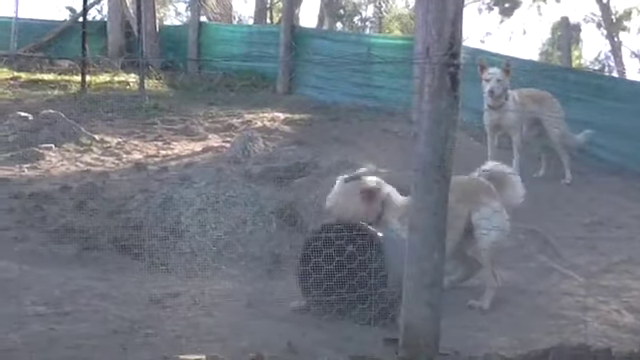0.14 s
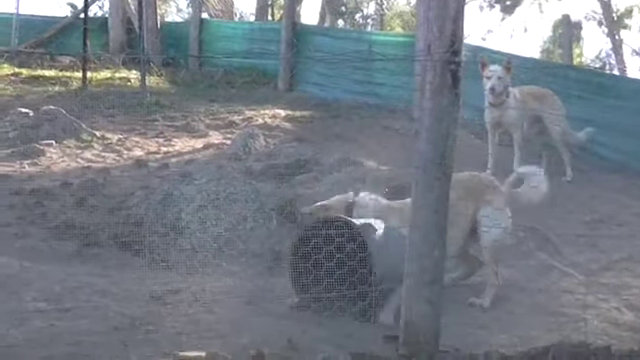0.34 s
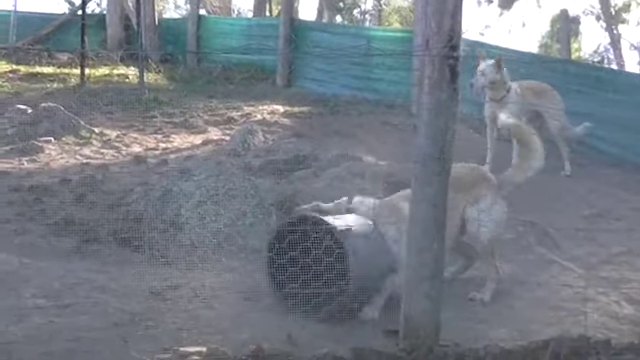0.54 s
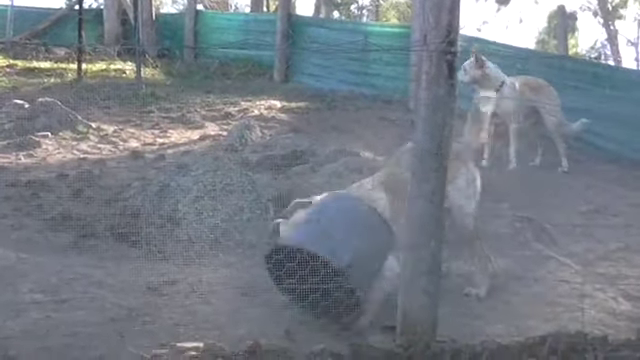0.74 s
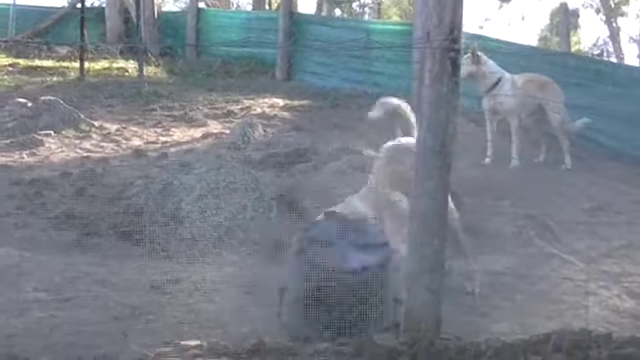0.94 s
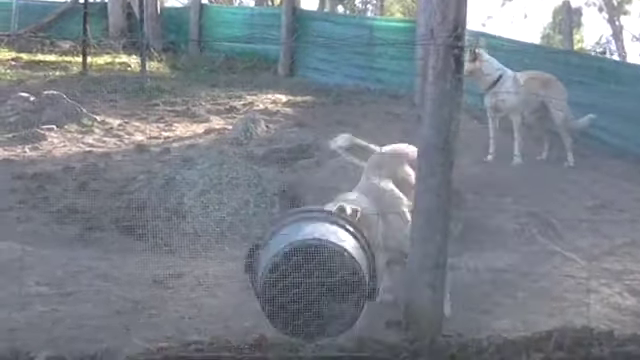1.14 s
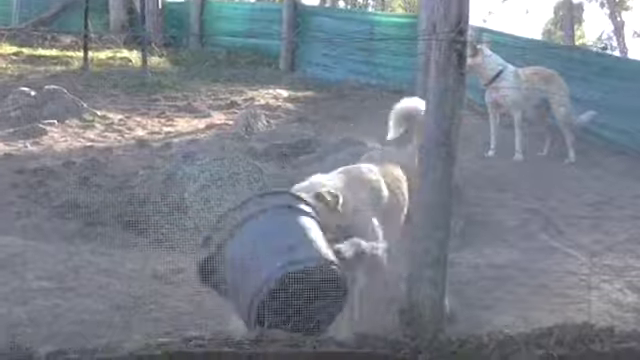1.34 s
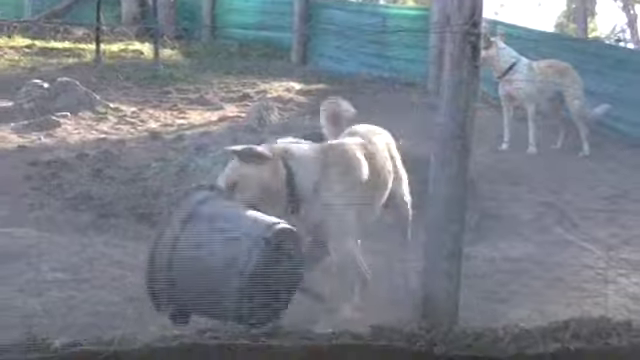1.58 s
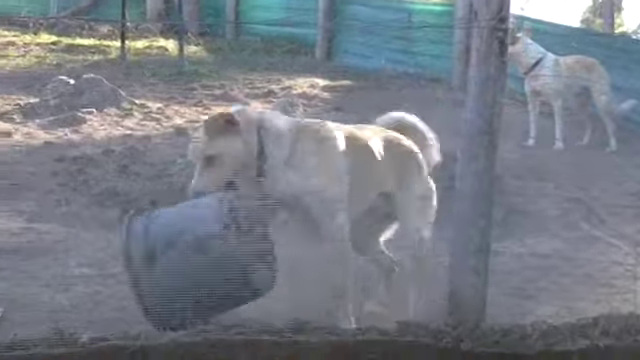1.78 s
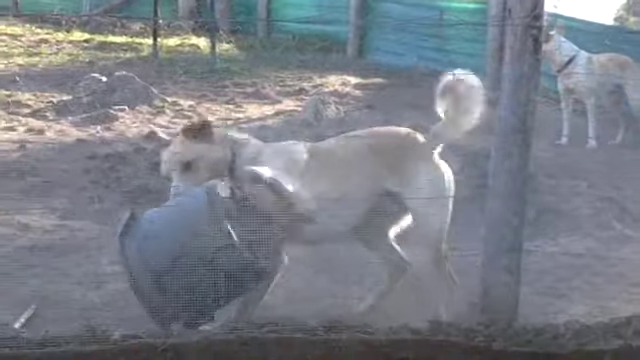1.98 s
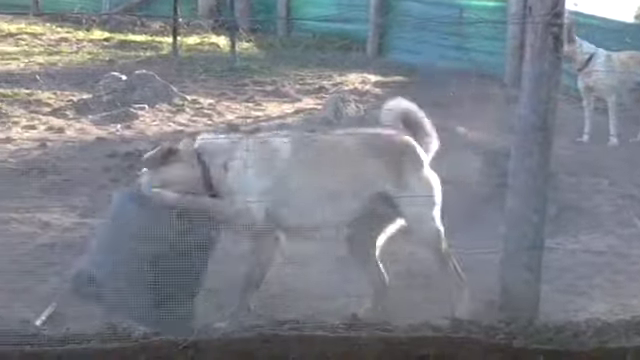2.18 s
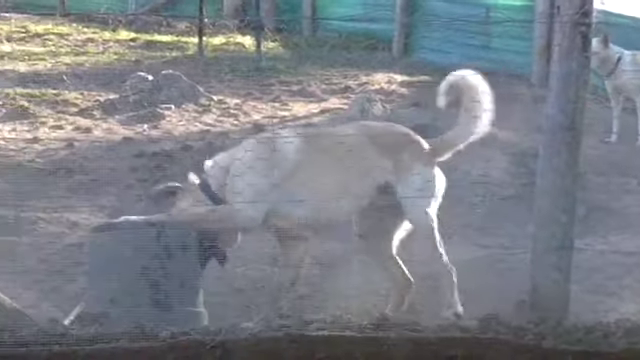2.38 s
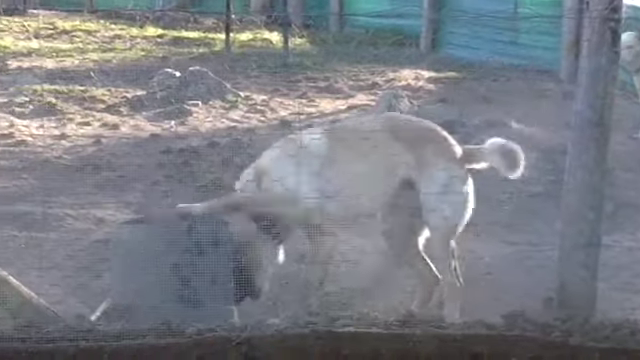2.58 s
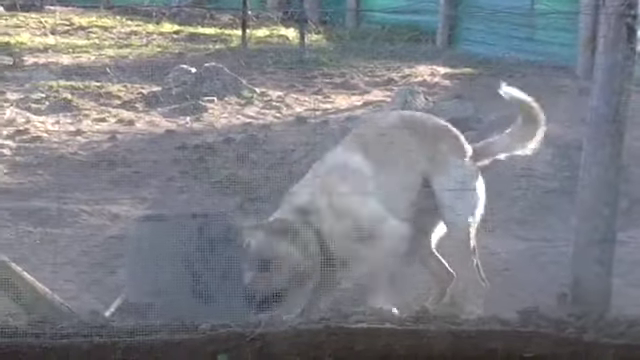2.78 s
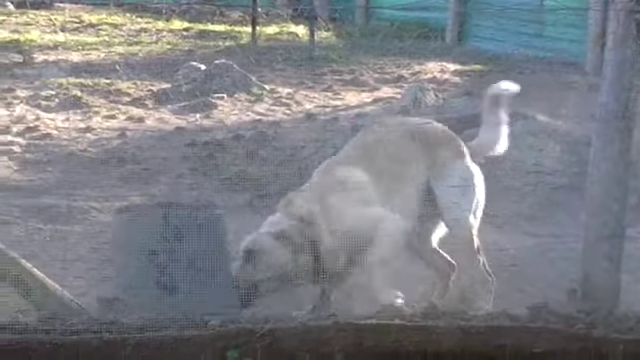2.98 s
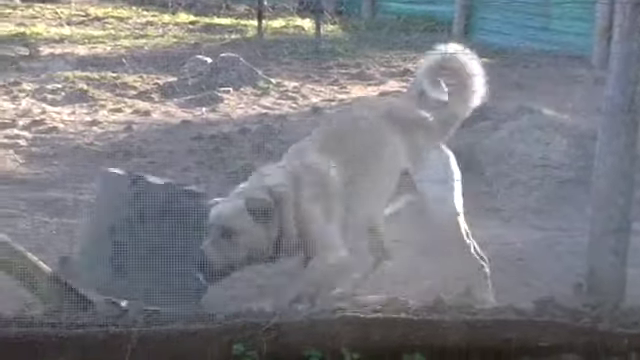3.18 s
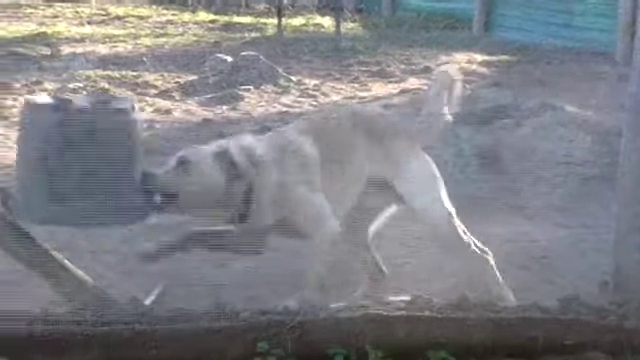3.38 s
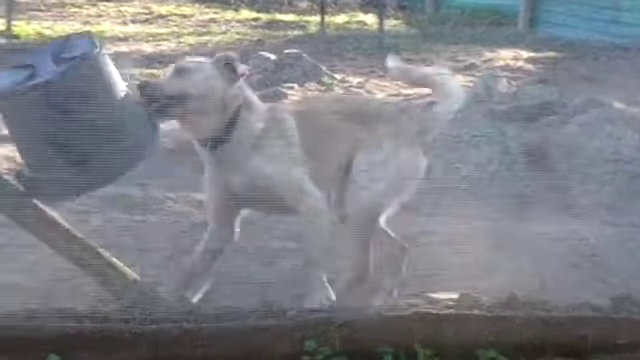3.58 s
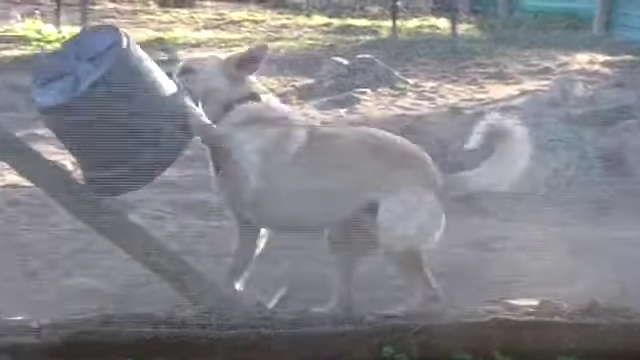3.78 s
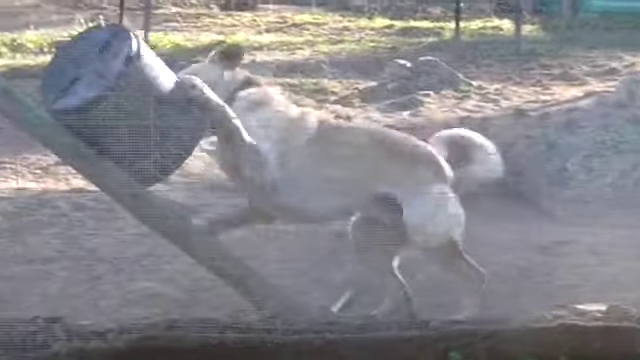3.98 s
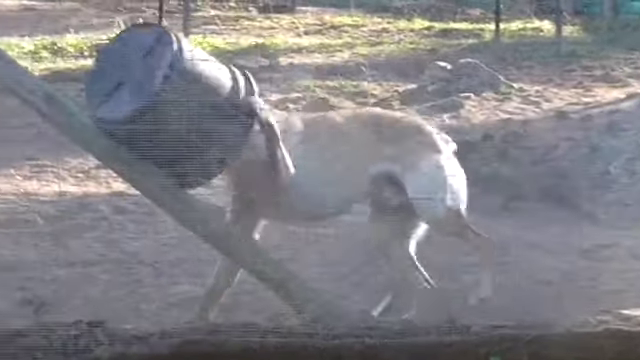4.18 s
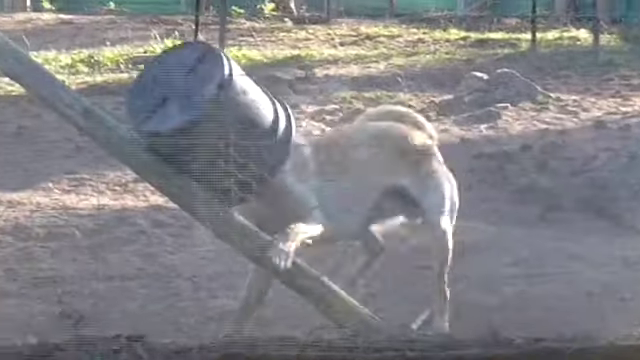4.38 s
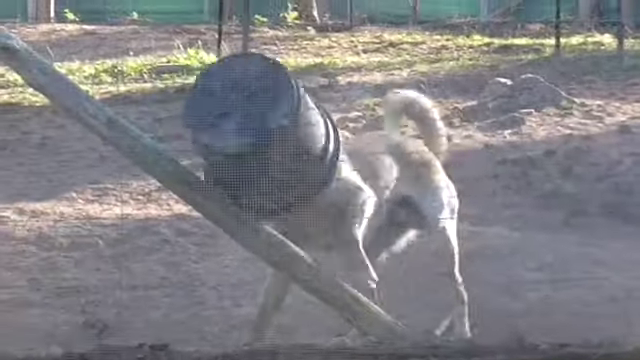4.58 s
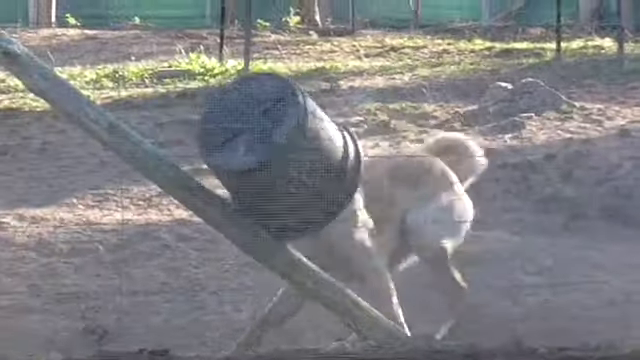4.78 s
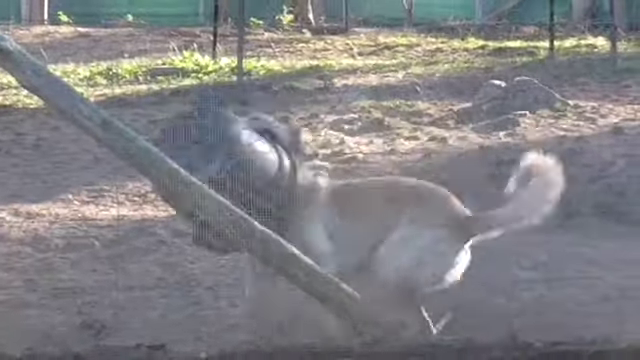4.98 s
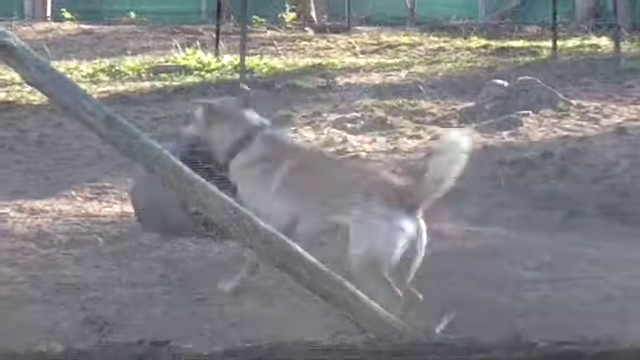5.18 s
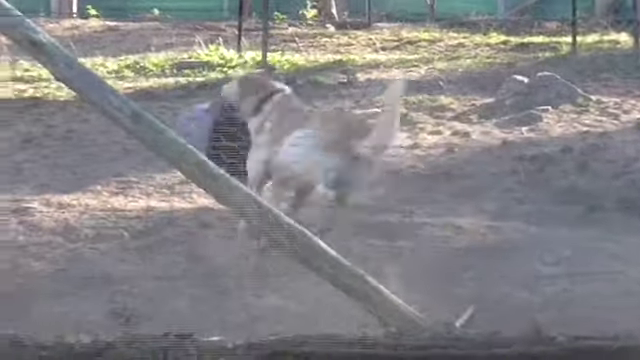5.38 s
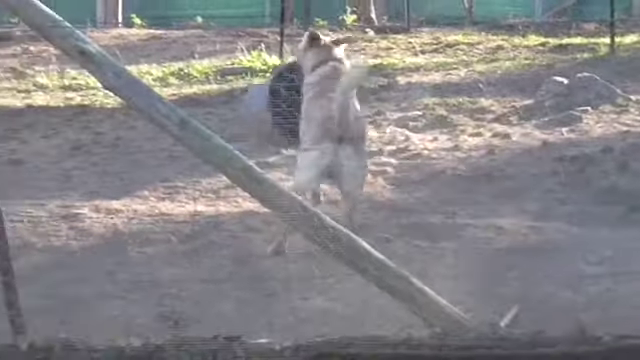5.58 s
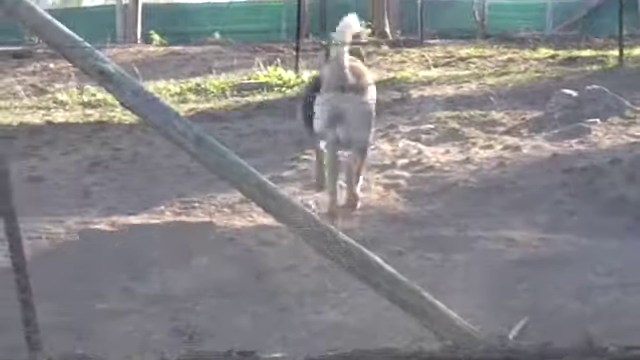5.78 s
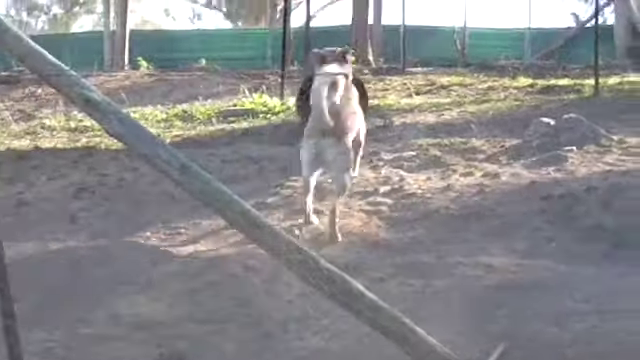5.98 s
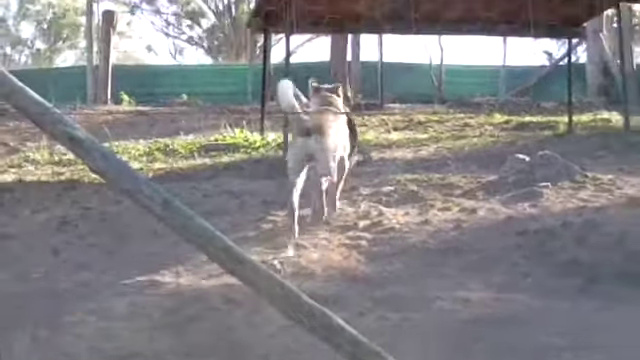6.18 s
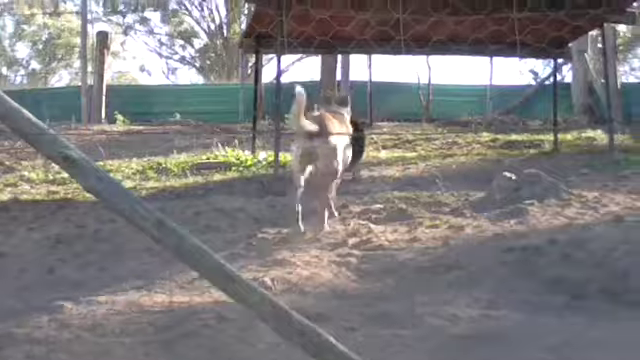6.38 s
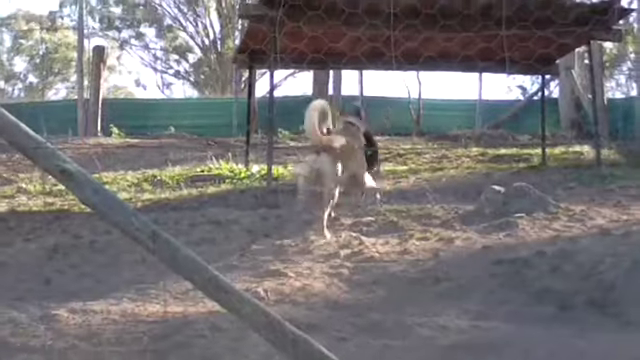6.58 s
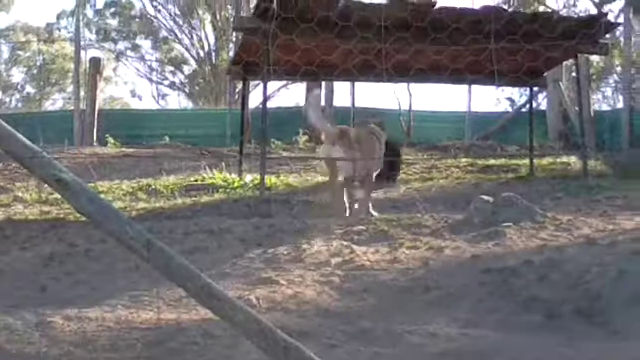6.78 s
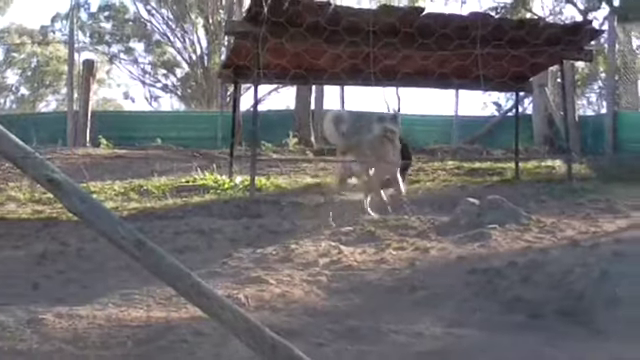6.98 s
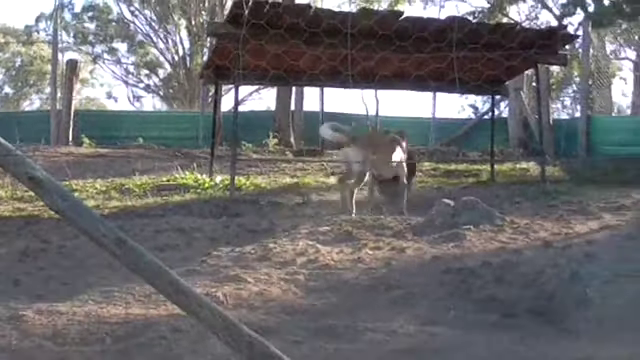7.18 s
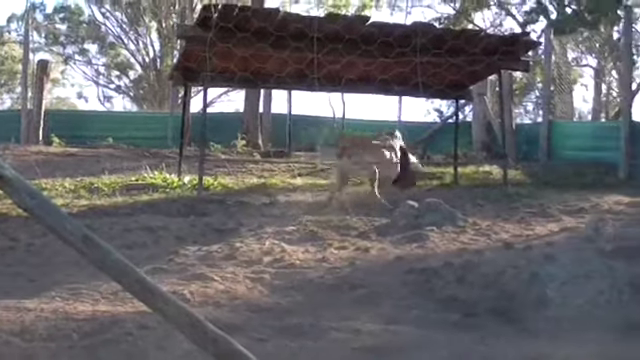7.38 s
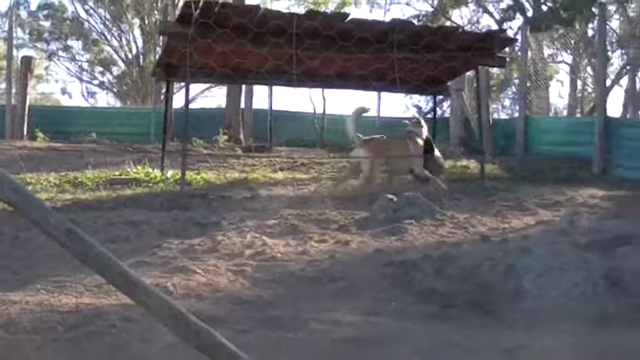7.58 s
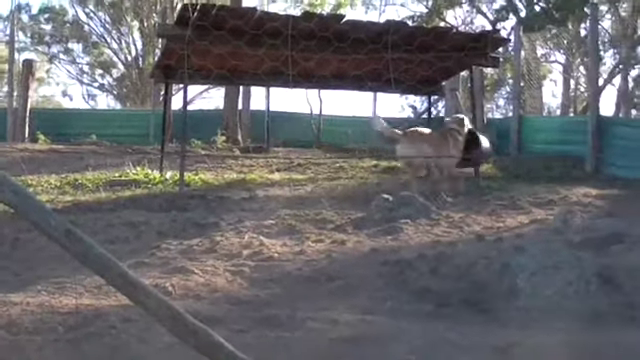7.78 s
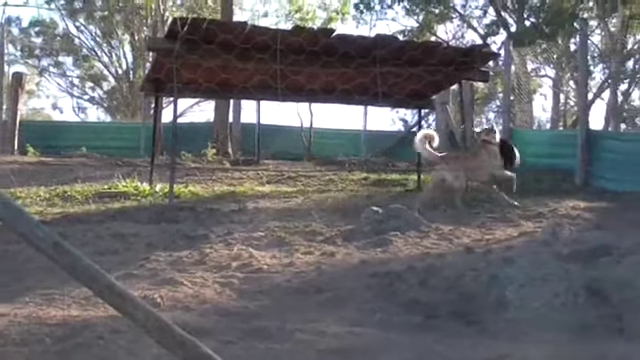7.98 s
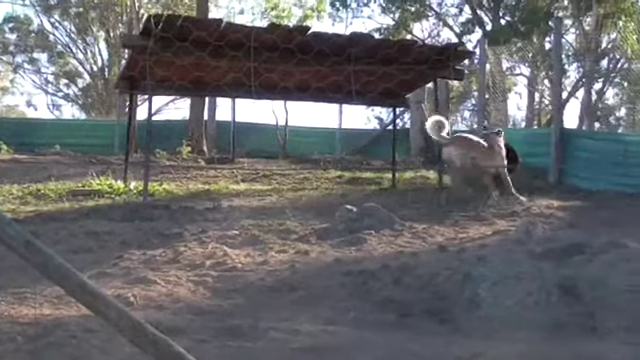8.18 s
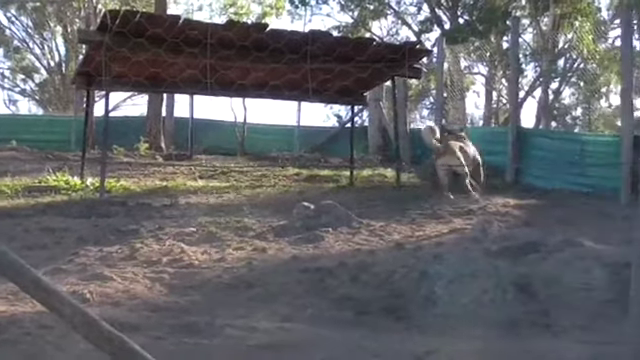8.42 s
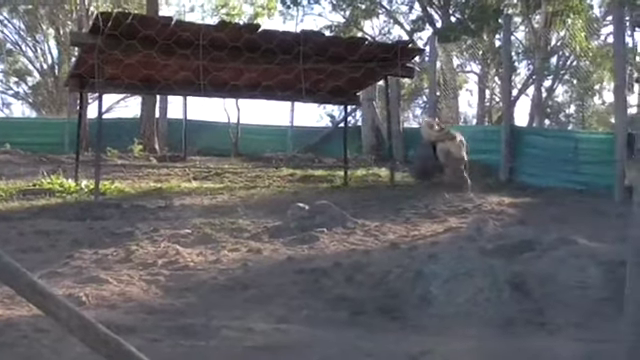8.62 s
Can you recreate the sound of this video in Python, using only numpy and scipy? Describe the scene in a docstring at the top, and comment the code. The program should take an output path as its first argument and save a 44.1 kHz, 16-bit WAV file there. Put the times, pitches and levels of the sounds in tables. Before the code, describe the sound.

In an open dirt yard, a dog plays roughly with a large plastic pot, heard in the centre by a camera microphone beyond a fence. From 0 s the pot gives short hollow knocks, rattles and scrapes, while hoarse parrots whistle brightly to the right, strongest in the first second, before a blurred distant flock. Between 1 and 1.7 s hard low booms land in quick succession with clatter and sharp ticks of claws or teeth. The heaviest thud falls near 2.5 s. Softer knocks follow around 3 s, then a loud scrape and clatter at 3.5 s, a sharp crack near 3.95 s and another deep blow at 4.1 s. Rattles and drags thin out through 5.4 s. From there to the end at about 8.6 s, only very weak knocks and soft dirt drags remain, with scattered raspy bird whistles over faint outdoor rumble.

```python
"""A dog knocks and drags a large plastic pot over a dirt yard, heard by a camera microphone beyond a fence.
From the start the pot booms, clatters and scrapes, while parrots whistle hoarsely in tall trees to the right.
Hard blows come between one and two seconds, the hardest near 2.5 s; grit and sharp ticks run between them.
After about 5.5 s only weak knocks and soft drags are left, with the birds over a faint outdoor rumble.
Sine bursts make booms and whistles; filtered noise makes wall, ticks, dirt, flock blur and yard."""
import sys
import numpy as np
from scipy import signal
from scipy.fft import rfft, irfft
from scipy.io import wavfile

SR = 44100
rng = np.random.default_rng(int(sys.argv[2]) if len(sys.argv) > 2 else 0)


def dump(signal):
    """Clip the signal to [-1, 1] and save it as 16-bit WAV at the path in sys.argv[1]."""
    limited = np.clip(np.atleast_2d(signal).T, -1, 1)
    pcm = np.round(limited * 32767).astype(np.int16)
    wavfile.write(sys.argv[1], SR, pcm)


N = 381465
T = np.arange(N) / SR


def undb(db):
    """Decibels to gain."""
    return np.exp(np.asarray(db) * np.log(10) / 20)


def unit(x):
    """Scale to rms 1."""
    return x / np.sqrt(np.mean(x ** 2))


def noise(n=N):
    """White noise of rms near 1."""
    return rng.standard_normal(n)


def walk(rate, n=N):
    """Random levels drawn rate times a second and joined by straight lines; spread near 1."""
    steps = int(n * rate / SR) + 2
    return 1.2 * np.interp(np.arange(n) * rate / SR, np.arange(steps), rng.standard_normal(steps))


def band(x, hz, width):
    """A resonance of gain 1 at its centre."""
    return signal.lfilter(*signal.iirpeak(hz, hz / width, SR), x)


def body(x, modes, wander_db=0.):
    """Sum of resonances of alternating sign, whose strengths wander separately."""
    total = 0
    for k, (hz, width, db) in enumerate(modes):
        strength = undb(db + wander_db * walk(9))
        total = total + (-1) ** k * strength * band(x, hz, width)
    return total


def cut(x, hz, kind):
    """Second-order low- or high-pass."""
    return signal.lfilter(*signal.butter(2, hz, kind, fs=SR), x)


def add(track, s, x):
    """Mix x into track from time s in seconds."""
    i = int(s * SR)
    track[i:i + len(x)] += x[:N - i]


def decay(t, t60):
    """Exponential fade by 60 dB in t60 seconds."""
    return undb(-60 * t / t60)


def grit(spread_db):
    """Dense grains of uneven size, rms 1."""
    size = np.minimum(rng.exponential(size=N), 6)
    return unit(noise() * undb(spread_db * size))


def tail(t60, wet_db, gap_s):
    """Left and right responses: scattered echoes dying away after a gap."""
    t = T[:int(t60 * SR)]
    h = rng.standard_normal((2, len(t))) * decay(t, t60) * (t > gap_s)
    return h / np.sqrt(np.sum(h ** 2, axis=1, keepdims=True)) * undb(wet_db)


def swells(s, length, db, rest_db, rise_db, fall_db):
    """Gain of overlapping round-topped swells over a resting level; far slopes are in dB per length."""
    t = T[::100]
    u = (t[:, None] - s) / length
    down = np.where(u < 0, rise_db, fall_db) * (np.hypot(u, .3) - .3)
    power = undb(2 * rest_db) + np.sum(undb(2 * (db - down)), axis=1)
    return np.interp(T, t, np.sqrt(power))


# Open air around the yard. Each point: frequency in Hz, relative spectral level in dB.
YARD_COLOUR = [(18, -32), (30, 1.5), (237, 13.5), (359, 8), (467, 14), (591, 5), (709, 11.5), (1550, 8),
               (4090, 1.5), (11000, -56), (15500, -63)]
# Steady background hums. Each row: centre in Hz, width of each of two passes in Hz, rms level in dB.
YARD_HUMS = [(243.7, 29, -69), (477, 57, -65.5)]


def yard():
    """Far rumble and air, shaped noise mostly unlike left and right, with two narrow hums in the middle."""
    hz, db = np.transpose(YARD_COLOUR)
    f = np.fft.rfftfreq(N, 1 / SR) + 1  # 1 Hz up, to avoid log of zero
    colour = undb(np.interp(np.log(f), np.log(hz), db))
    mid, left, right = (irfft(rfft(noise()) * colour, N) for _ in range(3))
    air = unit(0.1 * mid + np.array([left, right]))
    hums = sum(undb(level) * unit(band(band(noise(), h, width), h, width))
               for h, width, level in YARD_HUMS)
    return undb(-57 + 0.57 * walk(3.48)) * air + hums


def whistle(length, hz0, hz1, db, over_db):
    """A hoarse whistle scoops up and glides: a wavering, fluttering tone with three raspy overtones."""
    u = np.linspace(0, 1, int(length * SR))
    n = len(u)
    glide = hz0 + (hz1 - hz0) * u ** .7
    scoop = .07 * np.exp(-u * length / .01)
    hz = glide * (1 - scoop + .011 * walk(60, n) + .012 * walk(700, n))
    phase = 2 * np.pi * np.cumsum(hz) / SR
    rasp = phase + .45 * walk(600, n)
    over = unit(np.sin(2 * rasp) + 0.22 * np.sin(3 * rasp) + 0.064 * np.sin(4 * rasp))
    # the throat opens and shuts, but never quite
    tone_gate, over_gate = (unit(1.6 + np.tanh(1.5 * walk(70, n))) for _ in range(2))
    tone = tone_gate * np.sin(phase) * (1 + 0.25 * walk(500, n))
    tone = tone + undb(over_db) * over_gate * over
    return undb(db) * np.sin(np.pi * u) ** 0.34 * tone


# Bands of the distant flock's blur. Each row: centre in Hz, width in Hz, mean relative level in dB.
FLOCK_BANDS = [(3780, 1140, 8), (4500, 450, 8), (5250, 1640, 4), (6430, 850, -4), (10000, 1200, -13)]
# Outbursts of the far flock. Each row: peak time in seconds, length in seconds,
# level in dB before the flock is set to the right.
FLOCK_OUTBURSTS = [(0.127, 0.4, -42), (0.543, 0.14, -43.5), (0.875, 0.34, -45), (1.796, 1, -51.5),
                   (2.145, 1, -51.5), (2.9, 0.26, -46), (3.13, 0.19, -53.5), (3.846, 0.21, -46.5),
                   (4.396, 0.17, -53), (4.997, 0.42, -53), (5.253, 0.21, -48), (5.894, 0.78, -52),
                   (6.508, 0.11, -45.5), (6.824, 0.21, -46), (7.264, 0.52, -51.5), (7.868, 0.14, -46.5),
                   (8.077, 0.23, -46), (8.461, 0.076, -44)]


def flock():
    """Many short far calls at random over flickering noise bands, the blur of still more birds."""
    chirps = np.zeros((2, N))
    for k, (when, pitch, long, bend) in enumerate(rng.random((120, 4))):
        hz = 3300 * 2 ** (.8 * pitch ** 1.4)
        call = whistle(0.0182 + 0.0652 * long, hz * (.85 + .2 * bend), hz, db=0, over_db=-26.5)
        add(chirps[k % 2], when * N / SR, call)
    echoes = signal.fftconvolve(chirps, tail(0.4, 1.4, 0.0015), axes=1)[:, :N]
    chirps = chirps + echoes + 0.94 * chirps[::-1]  # much of each side is heard on the other
    mid, left, right = (body(band(noise(), 2600, 8000), FLOCK_BANDS, wander_db=6.0) * undb(3.2 * walk(40))
                        for _ in range(3))
    blur = unit(mid + 2.13 * np.array([left, right]))
    swell = swells(*np.transpose(FLOCK_OUTBURSTS), rest_db=-93, rise_db=21.5, fall_db=16.5)
    return swell * (blur + undb(-8) * unit(chirps))


# Tones of the nearer parrots to the right, whistles and some single strong overtones. Each row:
# start in seconds, length in seconds, start of glide in Hz, end of glide in Hz,
# level in dB before trees and placing.
NEAR_TONES = [ (0.062, 0.18, 2980, 3553, -35), (0.054, 0.13, 3750, 4470, -37.5),
              (0.464, 0.12, 4650, 5600, -44), (0.558, 0.086, 4070, 4060, -37),
              (0.604, 0.11, 3360, 3130, -44.5), (0.801, 0.08, 3940, 4370, -37.5),
              (0.806, 0.2, 3056, 3540, -38), (1.111, 0.2, 4090, 4200, -49),
              (1.212, 0.19, 3220, 3310, -53.5), (1.997, 0.085, 4730, 5920, -54),
              (2.038, 0.071, 3950, 3950, -42), (2.081, 0.18, 3300, 3225, -49.5),
              (2.429, 0.096, 4060, 4060, -48.5), (2.694, 0.034, 2830, 4430, -48),
              (2.72, 0.038, 4230, 4150, -54), (2.757, 0.024, 4480, 4600, -42.5),
              (2.78, 0.037, 3840, 3930, -39.5), (2.807, 0.077, 2720, 2710, -50),
              (2.873, 0.086, 4230, 4120, -48), (2.903, 0.173, 3100, 3130, -50.5),
              (3.078, 0.12, 2920, 2990, -51.5), (3.146, 0.055, 3676, 3760, -47.5),
              (4.674, 0.25, 2860, 4240, -54), (4.845, 0.71, 3605, 3380, -53),
              (5.062, 0.17, 1770, 1764, -55), (4.899, 0.3, 4440, 4350, -57),
              (5.189, 0.13, 4440, 4390, -43.5), (5.26, 0.2, 3750, 3250, -52), (5.537, 0.25, 900, 1623, -58),
              (5.546, 0.088, 3800, 3320, -49), (5.719, 0.026, 3160, 4550, -47),
              (5.743, 0.034, 3600, 3500, -44), (5.9, 0.23, 3524, 3560, -48),
              (5.877, 0.28, 1670, 1768, -58.5), (6.034, 0.18, 2854, 3277, -48.5),
              (5.932, 0.12, 5040, 5360, -56), (6.038, 0.16, 6070, 6080, -71),
              (6.385, 0.045, 4400, 5420, -53), (6.733, 0.17, 3610, 3490, -49),
              (6.745, 0.085, 878, 961, -50.5), (6.848, 0.19, 3420, 2750, -52),
              (6.892, 0.11, 3940, 4220, -50), (7.066, 0.1, 4230, 4390, -49), (7.11, 0.26, 6000, 5870, -56),
              (7.096, 0.131, 2960, 2900, -54), (7.183, 0.16, 3310, 3120, -50),
              (7.26, 0.14, 2570, 2430, -49.5), (7.395, 0.1, 2503, 1945, -48),
              (7.572, 0.041, 3660, 3550, -46), (7.742, 0.02, 5020, 3900, -45),
              (7.756, 0.022, 4150, 5200, -47), (7.895, 0.062, 3440, 3700, -49),
              (8.09, 0.035, 1900, 4350, -53), (8.449, 0.046, 1707, 1660, -49.5),
              (8.435, 0.055, 3750, 4050, -44.5), (8.454, 0.058, 3400, 3180, -53.5)]
# Change of overtone level: dB lost per octave below the knee (negative: gained), dB lost per octave above.
OVERTONE_LOSS = (-2.5, 128)


def near_tones():
    """The nearer birds' whistles and separate overtone lines; added overtones vanish above a knee pitch."""
    out = np.zeros(N)
    knee_hz, knee_db = 3302, -6.5
    for s, length, hz0, hz1, db in NEAR_TONES:
        octaves = np.log2((hz0 + hz1) / 2 / knee_hz)
        over_db = knee_db - OVERTONE_LOSS[int(octaves > 0)] * abs(octaves)
        add(out, s, whistle(length, hz0, hz1, db, over_db))
    return out


def birds():
    """Near calls scatter among echoing trunks; all the birds are louder on the right."""
    calls = near_tones()
    echoes = signal.fftconvolve(calls[None], tail(0.44, -4.5, 0.013))[:, :N]
    return (0.92 * calls + echoes + flock()) * undb([[-2.2], [2.2]])


# Shoves of pot and paws over the ground. Each row: peak time in seconds, length in seconds,
# then drive in dB of the hollow's drone, the wall's scrape and the loose dirt.
GROUND_SHOVES = [(0.01, 0.13, -58, -35, -67), (0.095, 0.094, -31, -44, -39.5), (0.214, 0.78, -45, -45, -60),
                 (0.866, 0.073, -34, -40.5, -47), (1.101, 0.06, -67, -37, -49),
                 (1.66, 0.032, -50, -57, -36.5), (1.73, 0.24, -38.5, -43.5, -54.5),
                 (2.33, 0.36, -39.5, -50.5, -54.5), (2.78, 0.17, -42, -50, -59),
                 (3.053, 0.16, -40.5, -43.5, -62), (3.287, 0.17, -33.5, -42.5, -60.5),
                 (3.436, 0.34, -33.5, -38, -65), (3.541, 0.17, -33, -30, -42),
                 (4.172, 0.14, -33, -49.5, -55), (4.472, 0.19, -62, -42.5, -59),
                 (4.866, 0.39, -36.5, -53, -55), (5.01, 0.13, -61, -42, -66),
                 (5.373, 0.07, -33, -47.5, -50), (5.71, 0.32, -53, -53.5, -57),
                 (6.481, 0.23, -81, -58.5, -62.5), (8.055, 0.53, -85, -59, -66)]
# Drive between shoves: hollow, wall and dirt, each in dB.
SHOVE_REST = (-93, -67.5, -71.5)


def shoves(layer):
    """How hard the shoves drive layer 0 (hollow), 1 (wall) or 2 (dirt)."""
    s, length, *db = np.transpose(GROUND_SHOVES)
    return swells(s, length, db[layer], SHOVE_REST[layer], rise_db=20.5, fall_db=23)


def dirt():
    """Loose dirt hisses under the shoves: fine grains, partly unlike left and right."""
    mid, side = (unit(cut(cut(grit(4.1) * undb(2 * walk(40)), 2460, "high"), 8700, "low"))
                 for _ in range(2))
    return shoves(layer=2) * (mid + 1.2 * side * np.array([[.5], [-1]]))


# Air modes of the hollow pot. Each row: centre in Hz, width in Hz, relative level in dB.
HOLLOW_MODES = [(217, 26.7, 8), (318, 13, -33), (139, 140, -19)]
# Modes of the plastic wall. Each row: centre in Hz, width in Hz, mean relative level in dB.
WALL_MODES = [(506, 54, 1.5), (645, 49, 2), (779, 55.5, -0.5), (1009, 92, -0.5), (1179, 98, -3.5),
              (1447, 220, 0), (1634, 170, -5.5), (1743, 72, -0.5), (1888, 384, -10), (2412, 270, -10)]


def drag():
    """Stick and slip over the ground: uneven noise drives the hollow and the wall, and rasps at the rim."""
    air = unit(body(noise() * undb(3.8 * walk(25)), HOLLOW_MODES))
    slips = band(grit(4.5) * undb(3.6 * walk(80)), 1130, 1720)
    rim = unit(band(slips, 1300, 1300))
    wall = unit(body(slips, WALL_MODES, wander_db=3.5)) + .45 * rim
    return air * shoves(layer=0) + unit(wall) * shoves(layer=1)


# Claws, teeth and stones ticking on plastic. Each row: time in seconds (onset 2 ms before),
# noise level in dB before filtering.
PLASTIC_TICKS = [(1.194, -37), (1.3414, -26), (1.48, -32.5), (1.6153, -30.5), (2.2394, -33),
                 (2.2508, -26.5), (3.227, -41), (2.4733, -32.5), (3.5583, -24), (3.9507, -15),
                 (3.9824, -34), (4.151, -31), (4.512, -37.5), (4.579, -35), (4.602, -36.5), (4.797, -35),
                 (5.345, -28)]


def ticks():
    """Hard points crack on the plastic: sharp noise bursts with a brief scratchy tail."""
    out, t = np.zeros(N), T[:SR // 5]
    fade = (1 - np.exp(-t / 0.0012)) * (decay(t, 0.011) + 0.055 * decay(t, 0.22))
    fade = fade / fade.max()
    for s, db in PLASTIC_TICKS:
        add(out, s - .002, undb(db) * noise(len(t)) * fade)
    return cut(cut(out, 2530, "high"), 9000, "low")


# Shakes of the pot wall. Each row: time in seconds (onset 2 ms before), drive in dB,
# frequency favoured by the place of contact in Hz.
WALL_SHAKES = [(0.031, -21, 590), (0.17, -31.5, 760), (0.675, -26, 776), (1.089, -17.5, 1320),
               (1.169, -19.5, 530), (1.194, -25, 547), (1.342, -25, 1290), (1.484, -27, 1340),
               (1.564, -40, 2240), (1.613, -32.5, 1560), (1.642, -29.5, 1660), (1.945, -37.5, 590),
               (2.088, -38, 1270), (2.138, -34, 1370), (2.248, -26, 1100), (2.285, -34.5, 1400),
               (2.365, -37.5, 600), (2.472, -17.5, 610), (3.225, -24.5, 496), (3.489, -25, 1200),
               (3.555, -21, 1780), (3.57, -17, 644), (3.662, -25.5, 890), (3.95, -15.5, 1300),
               (4.112, -19.5, 1000), (4.153, -26.5, 1340), (4.626, -31, 1080), (4.644, -28, 970),
               (4.744, -34, 1180), (4.799, -26.5, 1180), (4.814, -23.5, 1190), (4.865, -25, 1080),
               (5.076, -37, 1100), (5.326, -33.5, 520)]


def clatter():
    """Each shake is an uneven, fast-fading rattle of the wall; the contact favours modes near one pitch."""
    shake, t = np.zeros(N), T[:SR // 4]
    fade = 4.8 * decay(t, 0.011) + decay(t, 0.054) + 0.32 * decay(t, 0.3)
    fade = (1 - np.exp(-t / 0.0024)) * fade
    for s, db, hz in WALL_SHAKES:
        rattle = unit(noise(len(t)) * undb(2.5 * walk(119, len(t))) * fade)
        add(shake, s - .002, undb(db) * (0.68 * band(rattle, hz, 0.41 * hz) + 0.33 * rattle))
    wall = body(shake, WALL_MODES, wander_db=3.0) + 0.27 * band(shake, 890, 2150)
    return cut(wall, 3150, "low")


# Blows on the pot. Each row: time in seconds (onset 8 ms before), peak of this boom alone in dB,
# pitch in Hz, time to fall 60 dB in seconds (held to 0.03-0.5).
POT_BLOWS = [(0.038, -27, 213, 0.072), (0.112, -22.5, 216, 0.14), (0.174, -18.5, 233, 0.1),
             (0.368, -30.5, 223, 0.1), (0.587, -30.5, 225, 0.095), (0.763, -28, 225, 0.17),
             (0.883, -30, 279, 0.098), (1.091, -11.5, 213, 0.22), (1.176, -18.5, 223.5, 0.18),
             (1.359, -10, 210, 0.14), (1.489, -25, 206, 0.13), (1.611, -9.5, 215.7, 0.19),
             (1.735, -39, 286.5, 0.38), (2.151, -36, 216.7, 0.28), (2.245, -22, 272.4, 0.17),
             (2.305, -21.5, 266, 0.13), (2.368, -22.5, 277, 0.07), (2.482, -3, 198, 0.1),
             (2.781, -35, 233, 0.21), (2.954, -23, 160.5, 0.14), (3.006, -19, 194.4, 0.16),
             (3.045, -21.5, 179, 0.15), (3.146, -26, 218, 0.12), (3.18, -23.5, 192, 0.2),
             (3.279, -21.5, 217, 0.26), (3.657, -29.5, 227, 0.29), (3.954, -16.5, 222.5, 0.28),
             (4.122, -8.5, 209, 0.057), (4.534, -33, 184, 0.055), (4.656, -16, 210.6, 0.11),
             (4.809, -19.5, 226, 0.13), (4.865, -25, 205, 0.13), (5.077, -32, 229.3, 0.15),
             (5.33, -23.5, 200, 0.065), (5.376, -26, 206, 0.11), (5.857, -34, 213.5, 0.15),
             (6.329, -44, 214, 0.21), (6.755, -44, 215, 0.2), (7.749, -45, 220, 0.12),
             (8.21, -47.5, 220, 0.14)]


def blows():
    """Each blow pushes the air in the pot, and the hollow rings out as a decaying tone."""
    boom, t = np.zeros(N), T[:SR // 2]
    rise = (1 - np.exp(-t / 0.0026)) ** 2
    for s, db, hz, t60 in POT_BLOWS:
        air = np.sin(2 * np.pi * hz * t) * decay(t, np.clip(t60, .03, .5))
        # a duller, lower flex of the base beats against it
        air += undb(-13.0) * np.sin(2 * np.pi * 0.752 * hz * t) * decay(t, 0.15)
        air *= rise * undb(2.2 * walk(70, len(t)))  # the level wobbles as the pot rocks
        add(boom, s - .008, undb(db) * air / np.abs(air).max())
    return boom


def fence(pot):
    """The fence scatters the pot's sound, without its lows, in a short echo to both sides."""
    bright = cut(cut(pot, 340, "high"), 340, "high")
    return signal.fftconvolve(bright[None], tail(0.1, -8.0, 0.0032))[:, :N]


def scene():
    """The pot in the middle, the birds to the right, the open yard all round."""
    pot = blows() + clatter() + drag() + ticks()
    return yard() + birds() + dirt() + fence(pot) + pot


def record(dry):
    """The camera microphone thins the deep bass and cuts the top."""
    top = signal.ellip(8, .2, 70, 15700, fs=SR, output="sos")  # ripple dB, stopband dB, edge Hz
    return signal.sosfilt(top, cut(dry, 65, "high"))


dry = scene()
out = record(dry)
dump(out)
```